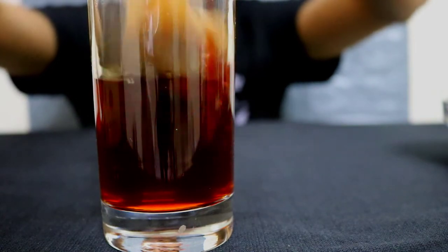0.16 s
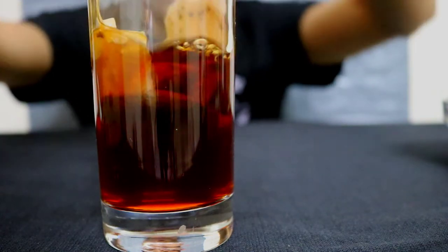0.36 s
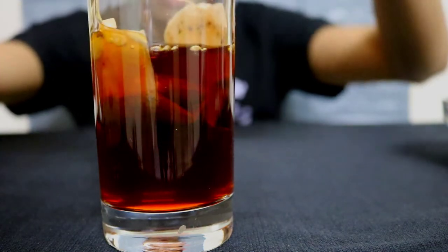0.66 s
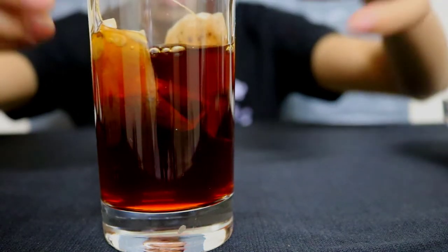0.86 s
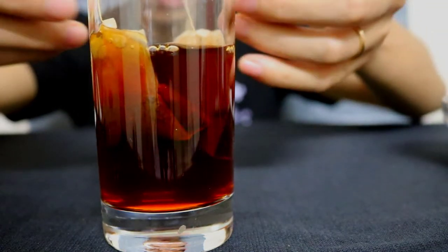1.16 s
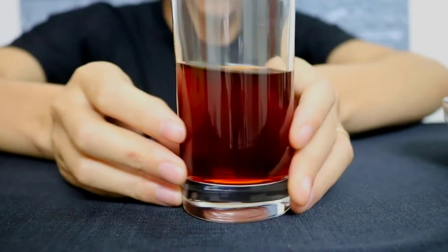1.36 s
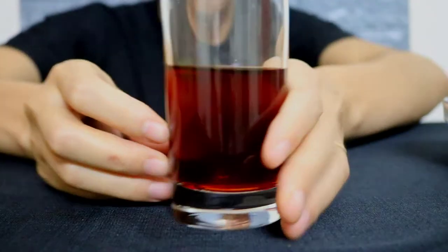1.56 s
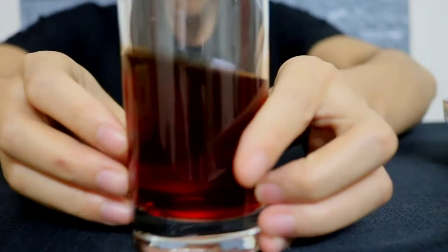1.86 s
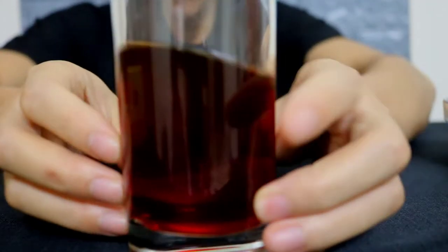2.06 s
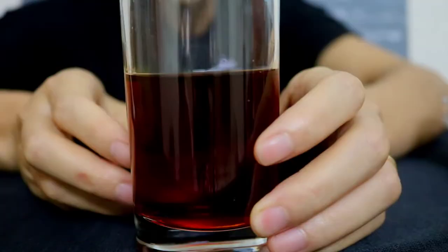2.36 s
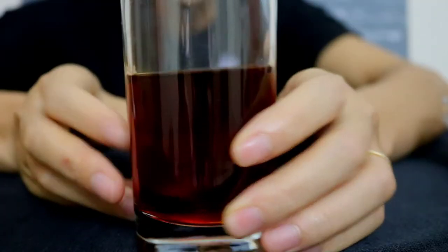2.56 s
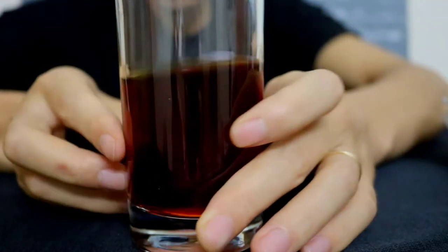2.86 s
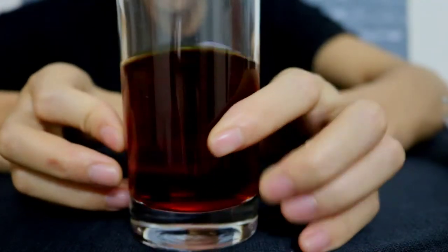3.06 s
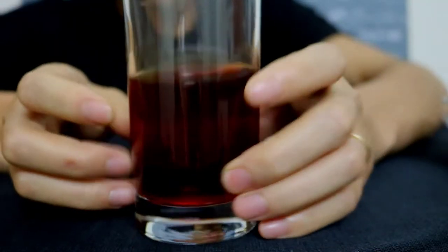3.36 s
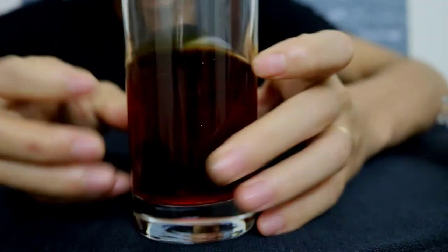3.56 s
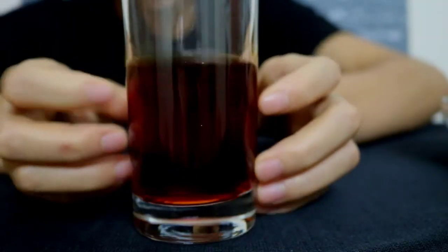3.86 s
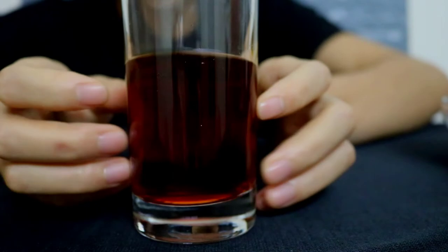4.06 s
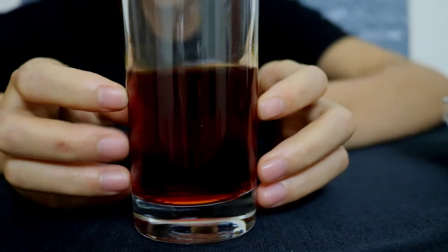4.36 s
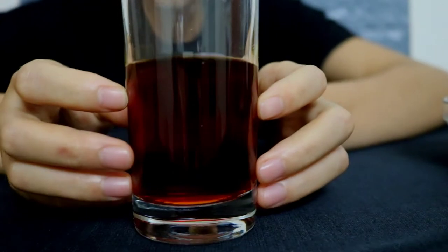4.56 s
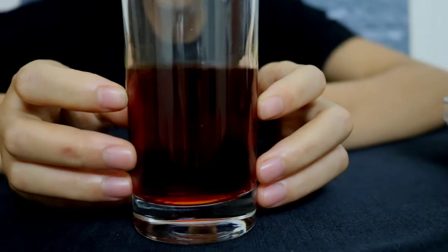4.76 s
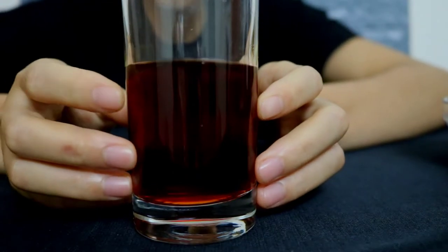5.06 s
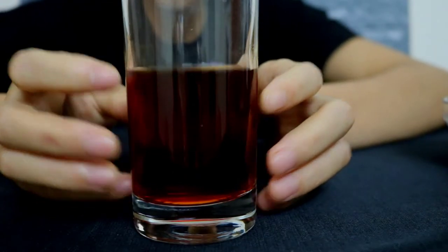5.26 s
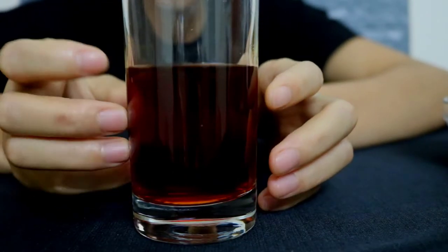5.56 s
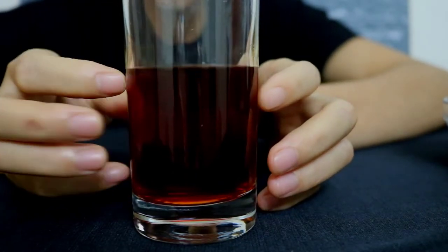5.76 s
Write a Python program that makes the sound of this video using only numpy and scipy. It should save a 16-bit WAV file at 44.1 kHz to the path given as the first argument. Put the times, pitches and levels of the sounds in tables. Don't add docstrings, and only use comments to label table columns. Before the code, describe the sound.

Fingernails tap a tall glass of tea, giving clear ringing clinks, with finger thuds on a cloth-covered table in a quiet room.

```python
import sys
import numpy as np
from scipy import signal
from scipy.fft import rfft, irfft
from scipy.io import wavfile
from scipy.ndimage import uniform_filter1d

SR = 44100
rng = np.random.default_rng(int(sys.argv[2]) if len(sys.argv) > 2 else 0)


def undo_db(level):
    steps = np.asarray(level, float) / 20
    return 10 ** steps


def unload_wav(signal):
    wavfile.write(
        sys.argv[1],
        SR,
        np.round(np.clip(np.atleast_2d(signal).T, -1, 1) * 32767).astype(np.int16),
    )


N = 260612


def coloured(points, lo_hz, hi_hz):
    f = np.maximum(np.arange(N // 2 + 1) * SR / N, 1)
    hz, db = np.transpose(points)
    shape = undo_db(np.interp(np.log(f), np.log(hz), db, right=-120))
    inside = (f > lo_hz) & (f < hi_hz)
    shape /= np.sqrt(np.sum(shape[inside] ** 2) / (N / 2))
    return irfft(rfft(rng.standard_normal(N)) * shape, N)


def walk(rate):
    k = int(SR / rate)
    steps = np.repeat(rng.standard_normal(N // k + 1), k)
    return 1.5 * uniform_filter1d(steps, k)[:N]


CLIMB_S = 0.09


def ring(hz, t60, db, climb=0):
    t = np.arange(SR) / SR
    hz, t60, db, climb = (np.reshape(v, (-1, 1)) for v in (hz, t60, db, climb))
    turns = hz * t + climb * (t + CLIMB_S * np.expm1(-t / CLIMB_S))
    return np.sum(undo_db(db - 60 * t / t60) * np.sin(2 * np.pi * turns), axis=0)


def add(out, s, sound):
    i = int(s * SR)
    out[i:i + len(sound)] += sound[:N - i]


def burst(noise, hz, length, spread):
    edges = np.clip([hz / spread, hz * spread], 50, .45 * SR)
    x = signal.sosfilt(signal.butter(2, edges, "band", fs=SR, output="sos"), noise)
    u = np.arange(len(x)) / SR / length
    x = x * np.sqrt(u) * np.exp(-u)
    return x / np.max(np.abs(x))


# (start [s], end [s])
SHOTS = [
    (0, 1.269),
    (1.288, 2.337),
    (2.354, 2.37),
    (2.787, 6),
]
# (air murmur [dB], cloth rustle [dB], fine hiss [dB])
STILL = [
    (-65.5, -69.5, -71.5),
    (-64.5, -65.5, -71),
    (-64, -67.5, -73),
]
# (start [s], length [s], rub [dB], heavy part above the rub [dB], fine part above the rub [dB])
SLIDES = [(0.075, 0.11, -68, 1, -3), (0.768, 0.14, -80, -3, 3), (0.886, 0.13, -78, 10, -5),
          (1.28, 0.071, -61, -7, -2.5), (1.352, 0.1, -63.5, -4, -6), (1.405, .055, -52, -6, -6),
          (1.46, .09, -50, -7, -6.5), (1.55, .08, -54.5, -9.5, -15), (1.87, 0.053, -62.5, 10.5, 0),
          (1.923, 0.077, -78.5, 16, 14), (2.02, .04, -57, -3, -20), (2.14, 0.28, -70.5, 10, -6),
          (2.776, 0.17, -60, 0.5, -4), (2.968, .21, -60.5, -4, -4.5), (3.244, 0.13, -60, 1.5, -8),
          (3.367, 0.073, -63, -4, -6), (3.458, 0.12, -59.5, -0.5, -6), (3.593, .13, -58, -5, -13),
          (3.732, 0.48, -63.5, -1, -8), (4.545, .3, -79, 11, -3), (5.252, .09, -65.5, -0.5, -8),
          (5.34, 0.056, -62.5, -2, -15), (5.419, 0.044, -65, 2, -12), (5.713, 0.1, -68, 1, -8)]
SLIDE_IN_S, SLIDE_OUT_S = .028, .028


def handling():
    t = np.arange(N) / SR
    stretch = np.searchsorted([SHOTS[1][0], SHOTS[-1][0]], t)
    power = undo_db(np.array(STILL)[stretch].T) ** 2
    for s, length, db, heavy_db, fine_db in SLIDES:
        swell = (t - s) / SLIDE_IN_S
        fade = (s + length - t) / SLIDE_OUT_S + 1
        shape = np.clip(np.minimum(swell, fade), 0, 1)
        power += undo_db([[db + heavy_db], [db], [db + fine_db]]) ** 2 * shape
    return np.sqrt(power)


# (time [s], level [dB])
LEAN = [(0, -59.5), (.5, -62.5), (.84, -61), (.94, -58), (1.06, -60), (1.3, -61.5), (1.48, -55),
        (1.68, -60), (1.85, -56), (1.93, -55.5), (2.1, -59.5), (2.8, -56.5), (3.6, -56), (4.19, -49.5),
        (4.4, -57), (5.15, -57), (5.3, -52), (5.45, -57.5)]
# (frequency [Hz], density [dB per Hz])
DRONE = [(30, -12.5), (70, -8.5), (150, -4), (300, -1), (500, -8), (800, -18), (1500, -38)]
MURMUR = [(300, -22), (600, 1.5), (1000, -1.5), (1700, -5.5), (2300, -15), (3500, -32)]
RUB = [(300, -23.5), (900, -9), (1900, 1.5), (4500, -1.5), (7000, -3.5), (10000, -9.5), (12800, -10.5),
       (14200, -31)]
HISS = [(3000, -29.5), (6000, -8.5), (9000, -1.5), (12000, -1), (13500, -4), (14500, -10), (16000, -10.5)]
RUB_FLICKER_DB, SELF_NOISE_DB = .9, -64.5


def air():
    drone = undo_db(np.interp(np.arange(N) / SR, *np.transpose(LEAN)))
    murmur, rub, hiss = handling()
    out = drone * undo_db(1.8 * walk(16)) * coloured(DRONE, 100, 590)
    out += murmur * undo_db(1.3 * walk(22)) * coloured(MURMUR, 700, 1800)
    out += rub * undo_db(RUB_FLICKER_DB * walk(40) - 1.2) * coloured(RUB, 2386, 4200)
    out += hiss * undo_db(.8 * walk(30) - 3.0) * coloured(HISS, 11000, 13000)
    return out + undo_db(SELF_NOISE_DB) * rng.standard_normal(N)


# (frequency [Hz], rms level [dB])
WHINE = [(7720, -85), (7896, -75), (7915, -80), (7994, -83), (8013, -82), (8033, -79), (8113, -79),
         (8133, -77), (8153, -86)]
# (frequency [Hz], width [Hz], level [dB])
HUMS = [(339, 30, -68), (2150, 150, -76), (3730, 90, -74), (7510, 80, -84), (8050, 300, -78)]
WHINE_ON_S = 2.78


def motor():
    t = np.arange(N) / SR
    out = np.zeros(N)
    for hz, db in WHINE:
        level = undo_db(db + 3 + 2 * walk(6))
        out += level * np.sin(2 * np.pi * (hz * t + rng.random()))
    for hz, width, db in HUMS:
        skirts = [(hz - 2 * width, -40), (hz - width / 2, -3), (hz, 0),
                  (hz + width / 2, -3), (hz + 2 * width, -40)]
        out += undo_db(db) * coloured(skirts, hz - width, hz + width)
    return out * (t > WHINE_ON_S)


# (time [s], level [dB], pitch [Hz], t60 [s])
SWAYS = [
    (.22, -45, 55.4, 0.39),
    (.64, -53, 55, 0.275),
    (0.791, -46, 53.4, 0.36),
    (4.403, -48, 110, 0.22),
]


def leg_sways():
    out = np.zeros(N)
    for s, db, hz, t60 in SWAYS:
        add(out, s, ring(hz, t60, db))
    return out


# (frequency [Hz], t60 [s], level [dB])
BOARD = [(234, 0.1, 0.5), (138, .12, -3.5), (400, 0.023, -3.5)]


def thud(dent_s, rows):
    out, (board_hz, board_t60, board_mode_db) = np.zeros(N), np.transpose(BOARD)
    for s, db, hz, t60, dent_db, board_db in rows:
        dent = signal.windows.hann(int(dent_s * SR)) ** 2
        add(out, s - dent_s / 2, -undo_db(db + dent_db) * dent)
        swing = ring(hz, t60, db)
        add(out, s + dent_s / 5, swing + ring(board_hz, board_t60, db + board_db + board_mode_db))
    return out


# (time [s], level [dB], t60 [s], first dent [dB], board ring [dB])
KNOCKS = [
    (1.114, -43, 0.019, 10, -17),
    (1.905, -28, 0.016, 2, -3.5),
    (3.878, -34, 0.014, 5, -2),
    (4.034, -31, 0.0063, 4.5, -3),
    (4.218, -44.5, 0.011, 13, 3),
    (5.718, -22.5, 0.0067, -18, -18.5),
]
FOOT_HZ, FOOT_DENT_S = 520, .0013


def foot_knocks():
    return thud(FOOT_DENT_S, [(s, db, FOOT_HZ, *rest) for s, db, *rest in KNOCKS])


# (time [s], level [dB], pitch [Hz], first dent [dB], board ring [dB])
FINGERS = [
    (0.177, -40.5, 210, -22, -14),
    (3.7318, -15.5, 220, -4.5, -14.5),
    (3.7738, -31.5, 225, -3, -13),
    (3.797, -26.5, 216, -3, -16),
    (4.1365, -4.5, 256, -3, -31),
]
FINGER_T60_S, LONGER_S_PER_DB = 0.0057, .0008
FINGER_DENT_S, SKIN_HZ = 0.0017, 940


def finger_thuds():
    rows = []
    for s, db, hz, *rest in FINGERS:
        rows.append((s, db, hz, FINGER_T60_S - LONGER_S_PER_DB * db, *rest))
    return signal.lfilter(*signal.butter(2, SKIN_HZ, fs=SR), thud(FINGER_DENT_S, rows))


# (time [s], peak [dB], centre [Hz], length [s])
PUFFS = [(0.066, -40, 11400, 0.0013), (0.0714, -48, 7050, 0.00196), (0.1009, -35.5, 10700, 0.0018),
         (0.29, -47, 11800, 0.0019), (0.302, -56, 6800, 0.0019), (0.379, -53, 8520, 0.002),
         (0.5785, -60, 3050, 0.002), (0.9093, -42.5, 11560, 0.0022), (0.9872, -50, 3000, 0.001),
         (1.1144, -43, 5000, 0.0007), (1.1147, -29.5, 9620, 0.00063), (1.6686, -52, 11420, 0.0013),
         (1.8676, -50, 4540, 0.00074), (4.1362, -33, 2900, 0.0005),
         (.65, -53, 11500, 0.016), (0.789, -57, 7020, 0.015), (0.883, -51, 10500, 0.0112),
           (1.1138, -45.5, 3800, 0.00079), (1.1142, -42, 1940, 0.0018), (3.262, -51, 2000, 0.035),
           (0.064, -48, 1050, 0.0026), (0.91, -51, 940, 0.0042), (1.237, -52, 1500, 0.0018),
           (1.213, -49, 9500, 0.013), (1.883, -48, 6300, 0.014)]


def ticks():
    out, events = np.zeros(N), PUFFS
    for s, db, hz, length in events:
        puff = rng.standard_normal(8192)
        add(out, s, undo_db(db + 1) * burst(puff, hz, max(length, .0003), 1.2))
    return out


# (frequency [Hz], t60 [s], level [dB])
FULL = [(1870, 0.13, 6), (4530, 0.15, -0.5), (8100, 0.12, 1.5), (12770, 0.067, -0.5)]
# (time [s], level [dB], hardness [dB per octave], ring length [share])
BUMPS = [
    (.178, -55.5, 1, 0.71),
    (.765, -62, -8, 0.7),
    (.988, -51.5, -7, 0.83),
    (1.085, -63, -13, 0.53),
]


def bag_bumps():
    out, (hz, t60, mode_db) = np.zeros(N), np.transpose(FULL)
    for s, db, hard_db, share in BUMPS:
        add(out, s, ring(hz, t60 * share, db + mode_db + hard_db * np.log2(hz / hz[0])))
    return out


FRONT, LEFT, RIGHT, LOW_LEFT, LOW_RIGHT = range(5)
# (time [s], blow [dB], place [index], hardness [dB per octave], click [dB])
TAPS = [
    (1.9041, -19.5, FRONT, 2.5, -16.5),
    (2.048, -67, FRONT, -7, -51),
    (3.7311, -53, RIGHT, 1, -34),
    (3.7962, -41, RIGHT, 1.5, -39),
    (3.8772, -24.5, LEFT, 0, -30.5),
    (4.033, -29, RIGHT, 2, -31),
    (4.1362, -36, LOW_LEFT, 0.4, -30),
    (4.2173, -33, RIGHT, -2, -35),
    (5.717, -22.5, LOW_RIGHT, 0.5, -31.5),
]
BEND_HZ = [1666, 1914, 1917.4, 1921, 1928, 2105, 4506, 4630, 4698, 4744, 6242, 6322, 7770, 8800]
# (front [dB], upper left [dB], upper right [dB], lower left [dB], lower right [dB])
BEND = [(-8.5, -26, -27, -15, -9), (-1, -39, -50.5, -34, -54.5), (-21, -4, -34, -20, -25.5),
        (-37.5, -35, -1, -29, -3.5), (-42, -42, -14, -27, -13.5), (-28, -40, -22, -45, -27),
        (-27.5, -32, -22, -24, -17.5), (-41, 5, -39, 4, -43.5), (-15, -4, 3.5, -2.5, 2),
        (-3.5, -33.5, 2, -26, -5), (0.5, 1.5, 3, -10, 0.5), (-29, -35, -42.5, -34.5, -30),
        (-19, -24, -22, -29, -22), (-21.5, -43, -39.5, -39.5, -39)]
BEND_T60_S = [0.049, 0.89, .65, 0.46, 0.51, .1, 0.33, 0.17, .14, .139, 0.12, .26, .029, 0.13]
RIM_HZ = [8880, 9262, 9316, 10062, 10175, 10657, 10700, 11370, 12046, 12095, 13150, 13302, 13560, 15060]
# (front [dB], upper left [dB], upper right [dB], lower left [dB], lower right [dB])
RIM = [(-42, -23, -25, -39.5, -35), (-33.5, -12.5, -10, -7, -38.5), (-8, -9, -38.5, -35, -39),
       (-27.5, -37.5, -37, -12, -32), (-21, -39.5, -38, -24.5, -28), (-32.5, -34.5, -8, -24, -30.5),
       (-11, -8, -21, -32.5, -18), (-19.5, -30, -28.5, -30, -36.5), (-14.5, -23, -15, -35, -17),
       (-29, -10.5, -27, -26, -39.5), (-39, -11, -42, -13, -38.5), (-39, -23, -36, -24.5, -40.5),
       (-30.5, -40, -16, -34.5, -16), (-36.5, -27, -33, -26.5, -42.5)]
RIM_T60_S = [.11, 0.08, .059, .15, .15, .047, .1, .03, .049, .13, .1, .15, .09, .1]
FREE = [0.95, 0.92, 0.97, 0.78, 0.8]
CONTACT_S, TOUCH_DB, TOUCH_S = 0.0015, -3, 0.0045
LOADED_HZ, CLIMB_HZ = 4630, 70
TWIN_DB, TWIN_LONGER, TWIN_APART = -25, 4.3, .003
LEAD_S, LEAD_DB = 0.0046, -22.5


def nail_taps():
    out, t = np.zeros(N), np.arange(SR) / SR
    hz, wall = np.array(BEND_HZ + RIM_HZ), np.array(BEND + RIM)
    free_t60 = np.array(BEND_T60_S + RIM_T60_S)
    next_times = [tap[0] for tap in TAPS[1:]] + [np.inf]
    high = hz >= LOADED_HZ
    twin_hz = hz[high] * (1 - TWIN_APART * rng.uniform(-1, 1.5, high.sum()))
    lead_n = 512
    lead = undo_db(LEAD_DB) * np.exp((np.arange(lead_n) - lead_n) / SR / LEAD_S)
    for (s, db, place, hard_db, click_db), next_s in zip(TAPS, next_times):
        puff = rng.standard_normal(lead_n)
        t60 = free_t60 * FREE[place]
        mode_db = db + wall[:, place] + hard_db * np.log2(hz / hz[1])
        tone = ring(hz, t60, mode_db, CLIMB_HZ * (hz == LOADED_HZ))
        tone += ring(twin_hz, t60[high] * TWIN_LONGER, mode_db[high] + TWIN_DB)
        held = undo_db(TOUCH_DB * np.clip((t - (next_s - s)) / TOUCH_S + 1, 0, 1))
        add(out, s, tone * np.clip(t / CONTACT_S, 0, 1) * held)
        click = burst(puff, 1580, 0.001, 1.14) + burst(puff, 3600, 0.00031, 1.7)
        add(out, s, undo_db(click_db) * click)
        lead_in = tone[:lead_n][::-1] * lead * uniform_filter1d(puff, size=40) * 6
        add(out, s - lead_n / SR, lead_in)
    return out


THUD_ROOM_DB = -6
ROOM_T60_S, ROOM_DB, ROOM_LOW_HZ, ROOM_TOP_HZ = .42, -19, 400, 9100


def room(sound):
    t = np.arange(SR // 2) / SR
    tail = rng.standard_normal(len(t)) * undo_db(-60 * t / ROOM_T60_S) * np.clip(t / .008, 0, 1)
    tail = signal.lfilter(*signal.butter(1, [ROOM_LOW_HZ, ROOM_TOP_HZ], "band", fs=SR), tail)
    tail *= undo_db(ROOM_DB) / np.sqrt(np.sum(tail ** 2))
    return signal.fftconvolve(sound, tail)[:N]


def scene():
    near = nail_taps() + bag_bumps() + ticks()
    thuds = finger_thuds() + foot_knocks() + leg_sways()
    echoes = room(near + undo_db(THUD_ROOM_DB) * thuds)
    return (near + thuds + echoes + air() + motor())[None]


def low_pass(x):
    return signal.sosfilt(signal.butter(12, 16460, fs=SR, output="sos"), x)


MIC_LOW_HZ, TOP_HZ, SPILL_TOP_HZ = 110, 15800, 4300


def record(dry):
    x = signal.sosfilt(signal.butter(2, MIC_LOW_HZ, "high", fs=SR, output="sos"), dry)
    x = signal.sosfilt(signal.ellip(8, .2, 60, TOP_HZ, fs=SR, output="sos"), x)
    t = np.arange(N) / SR
    on = sum(1. * (t >= a) * (t < b) for a, b in SHOTS)
    spill = np.clip(uniform_filter1d(on, int(.028 * SR)) * 8, 0, 1)
    fade_in = uniform_filter1d(on, int(.008 * SR), origin=int(.004 * SR) - 1)
    heard = on * fade_in
    dull = signal.sosfilt(signal.butter(8, SPILL_TOP_HZ, fs=SR, output="sos"), x)
    mix = x * heard + dull * (1 - heard) * undo_db(-26) * spill
    return low_pass(mix)


dry = scene()
out = record(dry)
unload_wav(out)
```